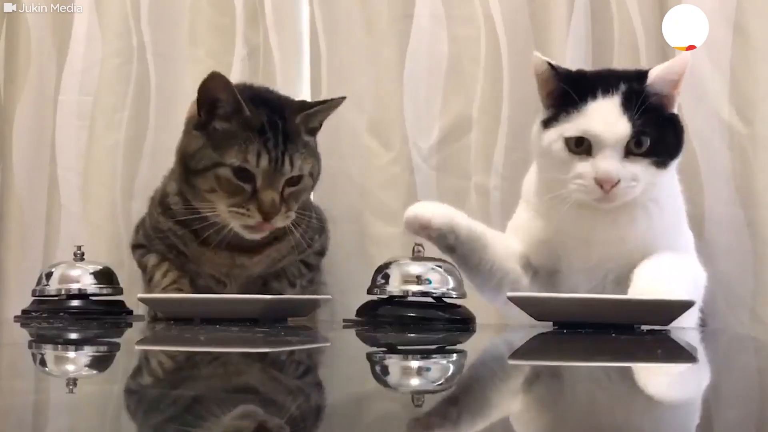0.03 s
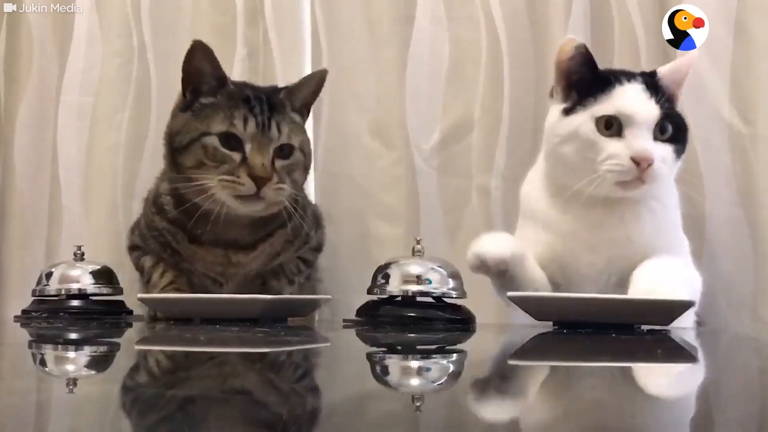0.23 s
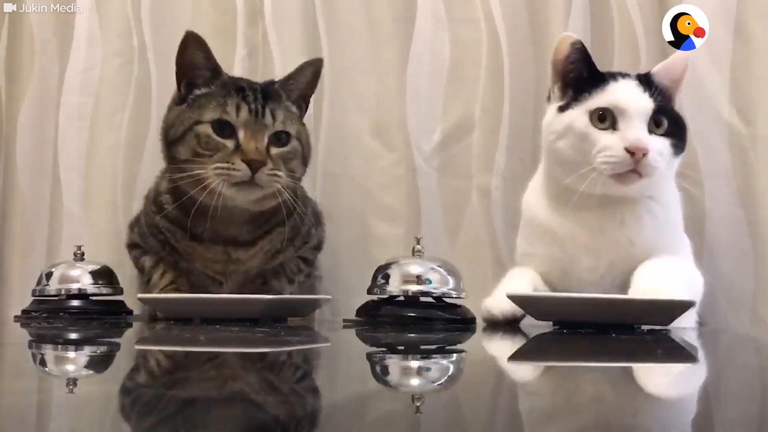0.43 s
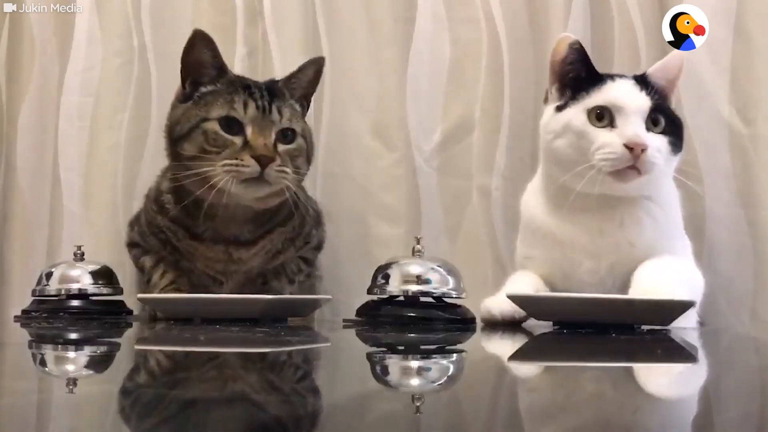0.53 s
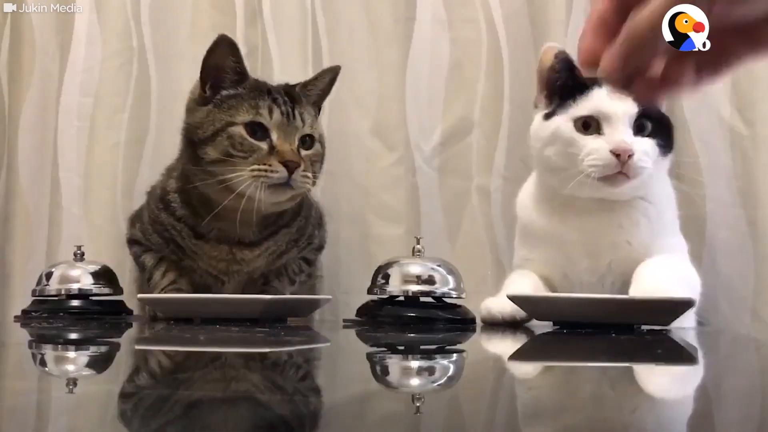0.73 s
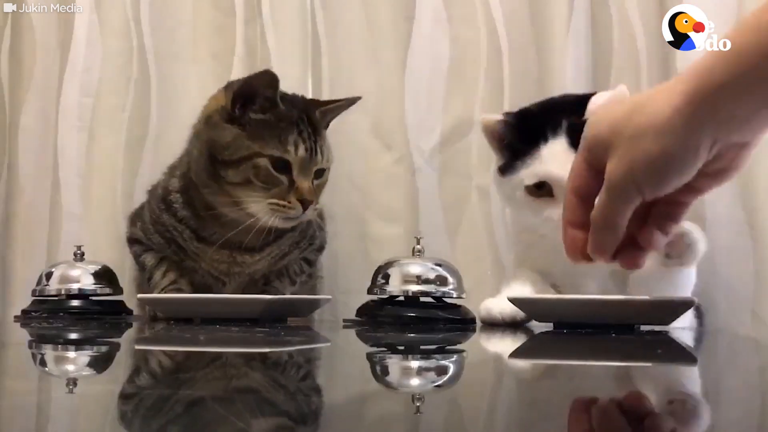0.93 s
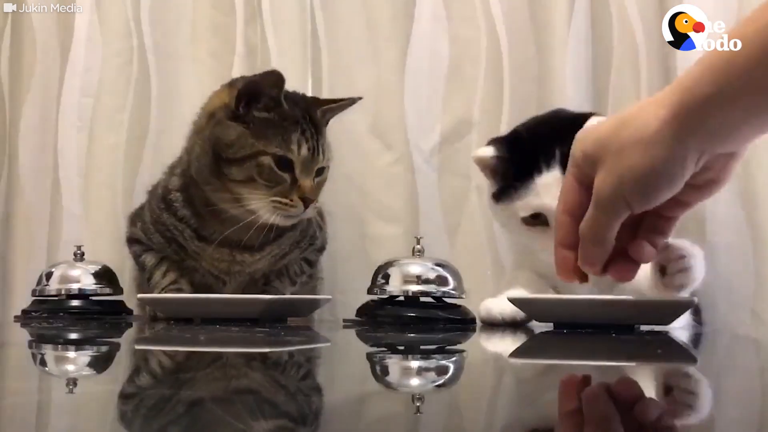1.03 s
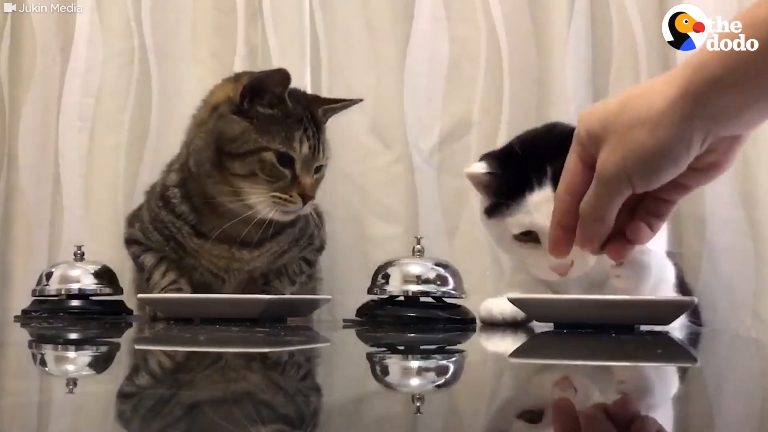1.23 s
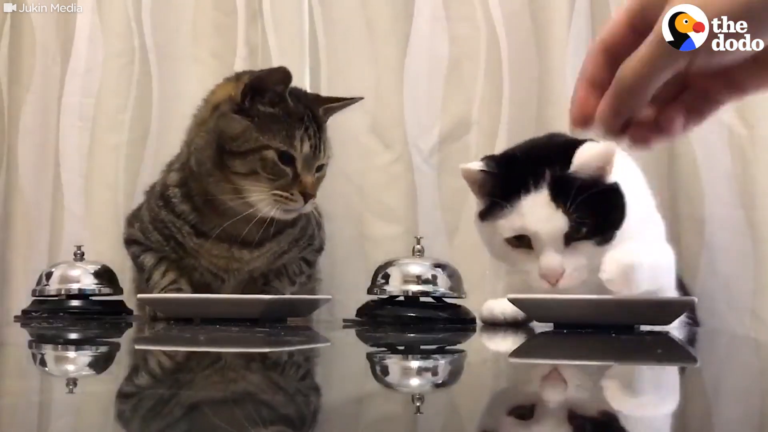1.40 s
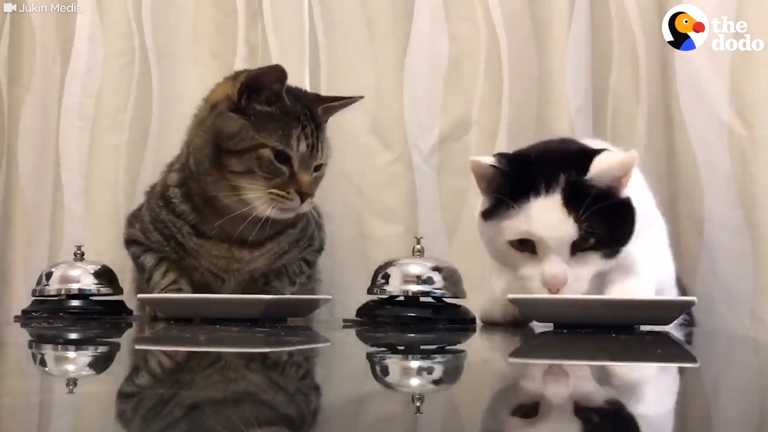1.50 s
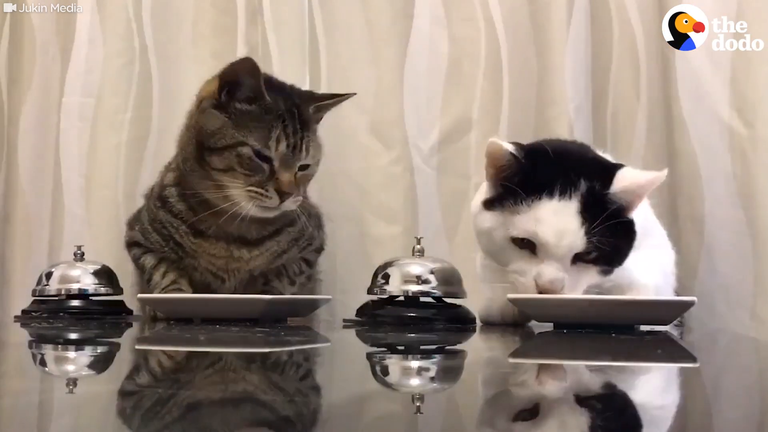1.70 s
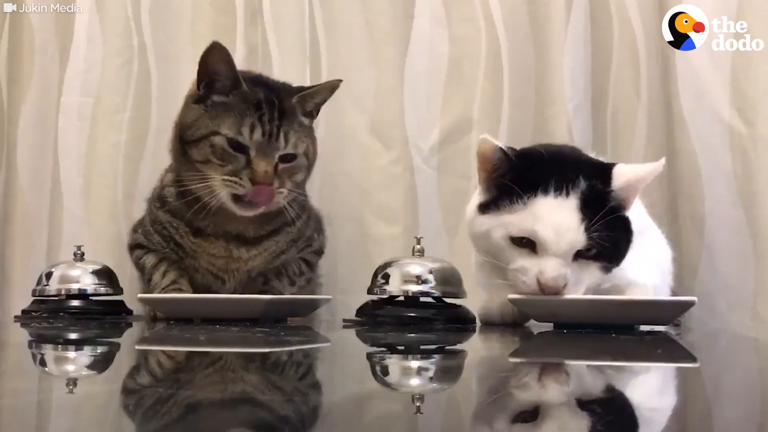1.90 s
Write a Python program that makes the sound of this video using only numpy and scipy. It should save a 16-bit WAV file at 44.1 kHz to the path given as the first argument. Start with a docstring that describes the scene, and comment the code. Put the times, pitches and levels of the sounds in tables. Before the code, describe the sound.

Two bright dings come from a desk bell close to the microphone in a small, quiet room. Its plunger rattles lightly, and the high ring wavers and slowly fades while a hard treat ticks once on a china plate.

```python
"""A counter bell rings twice in quick succession under a cat's paw, on a glass table in a small, quiet room.
The clapper strikes the dome, whose partials beat and swell over the hum of bells struck earlier.
The loose plunger rattles and the base knocks back on the table. A treat ticks on a china plate
and the cat noses at it. Fur brushes and paws rumble faintly above the room tone."""
import sys
import numpy as np
from scipy import signal
from scipy.fft import rfft, irfft
from scipy.io import wavfile

SR = 44100
rng = np.random.default_rng(int(sys.argv[2]) if len(sys.argv) > 2 else 0)


def persist_wave(psi):
    """Save psi, clipped to +-1, as 16-bit WAV."""
    counts = np.round(np.clip(psi, -1, 1) * 32767).astype(np.int16)
    wavfile.write(sys.argv[1], SR, np.atleast_2d(counts).T)


N = 85995

# The clapper hits the dome. Each row: start in seconds, click level in dB.
STRIKES = [(0.2231, -35.5), (0.3571, -33)]
# The pitches of the dome's partials in Hz, low to high.
DOME_HZ = [1114.7, 2864.7, 5219.5, 8122.8, 11582.8, 15447]
# How those partials ring. Each row: level before swell in dB for the first strike and for the second,
# t60 in seconds, beat rate in Hz, beat depth from 0 to 1.
DOME_PARTIALS = [(-62.5, -54.5, 44, 0.8, .08), (-45.5, -37.5, 9.06, 31, 0.04),
                 (-32.5, -30.5, 3.56, 27, 0.05), (-25, -28, 1.07, 8.8, .25), (-27.5, -27.5, .48, 4.0, .15),
                 (-58, -62, .25, 18, .4)]
# Level rides on the second (low) and third (high) partials. Each row: time in seconds, gain in dB.
SWELL_LOW = [(0.225, 2.5), (0.26, 0), (0.38, -2), (0.6, -1), (0.95, 3.5), (1.4, 0), (1.6, 1), (1.75, -3.5),
             (1.93, 2)]
SWELL_HIGH = [(0.23, 2), (0.30, -7), (0.345, -3.5), (0.365, 1.5), (0.44, -2), (0.71, 3), (0.79, 0.5),
              (0.9, 3), (0.96, -1), (1.04, 2), (1.28, -3), (1.38, 0), (1.5, -1.5), (1.93, 1)]
FLUTTER_DEPTH, FLUTTER_HZ = 0.06, 14


def dome():
    """Each strike resets the partials' levels; they beat, swell, and flutter as cats move in the sound."""
    t, ring = seconds(), np.zeros(N)
    starts = [start for start, _ in STRIKES]
    ends = starts[1:] + [np.inf]
    swells = {1: SWELL_LOW, 2: SWELL_HIGH}
    for k, (hz, (*levels_db, t60, beat_hz, beat_depth)) in enumerate(zip(DOME_HZ, DOME_PARTIALS)):
        swell = from_db(np.interp(t, *np.transpose(swells[k]))) if k in swells else 1
        flutter = FLUTTER_DEPTH * (drift(FLUTTER_HZ) + 1j * drift(FLUTTER_HZ))  # in level and phase
        partial = np.exp(2j * np.pi * hz * (t - starts[0]))
        for start, end, db in zip(starts, ends, levels_db):
            beat = beat_depth * np.exp(2j * np.pi * beat_hz * (t - start))
            tone = np.imag(partial * (1 + beat + flutter))
            gate = attack(start) * (1 - attack(end))
            ring += from_db(db) * swell * tone * decay(start, t60) * gate
    return ring


# The plunger clatters in its guide. Each row: start in seconds, level in dB.
RATTLES = [(0.086, -72.5), (0.136, -67.5), (0.200, -63), (0.207, -55), (0.2235, -45.5), (0.254, -44),
           (0.266, -50.5), (0.3572, -45.5), (0.376, -45), (0.395, -51.5), (0.447, -50)]
# The plunger's ring. Each row: pitch in Hz, relative level in dB, t60 in seconds.
PLUNGER_MODES = [(1330, -21, 0.063), (3360, -9, 0.09), (3613, -11.5, 0.11), (4060, -15.5, .08),
                 (4316, -1, .035), (4362, -9, 0.13), (4758, -12, .08), (6400, -10, .055),
                 (7050, -16, 0.044), (9880, -13, 0.068), (10500, -14, .07), (12870, -10.5, .055),
                 (14200, -7.5, .055), (15290, -6, .06)]
# The colour of metal contacts. Each row: frequency in Hz, relative level in dB.
METAL_COLOUR = [(100, -32), (220, -15), (340, -1), (480, -16), (850, -19.5), (1350, -3), (2200, -12),
                (3500, -2.5), (4500, -1.5), (6000, -11), (10000, -5), (13000, -11), (15000, -5)]


def plunger():
    """The clapper clicks on the dome; each rattle of the plunger is a noise burst and a bright ring."""
    clicks = sum(from_db(db) * decay(start, t60=0.01) for start, db in STRIKES)
    chatter = sum(from_db(db - 4.5) * decay(start, t60=0.032) for start, db in RATTLES)
    rings = sum(from_db(db) * struck(PLUNGER_MODES, start, scatter_db=1.5) for start, db in RATTLES)
    return (clicks + chatter) * noise(METAL_COLOUR) + rings


# The base drops back on the table. Each row: start in seconds, level in dB.
KNOCKS = [(0.4455, -51), (0.4545, -54.5)]
# The colour of the knock. Each row: frequency in Hz, relative level in dB.
KNOCK_COLOUR = [(100, -14.5), (220, -14.5), (340, -3.5), (450, -6), (660, -1.5), (820, -17.5), (1350, 5.5),
                (1850, -7.5), (2400, -4.5), (4500, -9.5), (9000, -31), (15000, -23.5)]
# The base's ring. Each row: pitch in Hz, relative level in dB, t60 in seconds.
BASE_MODES = [(350, -23.5, .08), (569, -16.5, .05), (675, -11.5, 0.12), (1321, -9, 0.11),
              (1635, -14, 0.063), (1990, -11.5, 0.076), (2330, -17, .08)]


def base():
    """The bell's base settles on the glass with a double knock."""
    knocks = np.zeros(N)
    for start, db in KNOCKS:
        impact = noise(KNOCK_COLOUR) * decay(start, t60=0.11)
        knocks += from_db(db) * (impact + struck(BASE_MODES, start, scatter_db=2.0))
    return knocks


# The plate's ring. Each row: pitch in Hz, relative level in dB, t60 in seconds.
PLATE_MODES = [(169, -25, .18), (205, -22.5, 0.15), (1450, -31.5, .1), (1727, -26, 0.074),
               (3160, -16, .035), (4200, -27, .07), (4877, -12.5, 0.06), (6740, 1.5, 0.022),
               (6740, -19, .11)]
# The colour of the treat's tick. Each row: frequency in Hz, relative level in dB.
TICK_COLOUR = [(200, -6), (700, -24.5), (1600, 7), (2300, -24.5), (3500, 1.5), (7000, -8), (8800, -31.5),
               (15000, -23.5)]
TREAT_START_S, TREAT_GAIN_DB = 1.3497, -39.5


def treat():
    """A hard treat ticks on the china plate and sets it ringing briefly."""
    tick = from_db(-9.5) * noise(TICK_COLOUR) * decay(TREAT_START_S, t60=0.018)
    ring = struck(PLATE_MODES, TREAT_START_S, scatter_db=1.5)
    return from_db(TREAT_GAIN_DB) * (tick + ring)


# The hum under the ring. Each row: pitch in Hz, level in dB, t60 in seconds.
HUM_PARTIALS = [(1116, -74, 40), (1122.7, -67, 13), (1162.7, -65, 21)]


def lingering_hum():
    """Bells struck earlier still sing on their long-lived lowest partials."""
    return sum(from_db(db) * decay(0, t60) * np.sin(2 * np.pi * (hz * seconds() + rng.random()))
               for hz, db, t60 in HUM_PARTIALS)


# Fur brushes the bell, later the plate. Each row: centre and spread in seconds, level in dB.
BRUSHES = [(0.071, .06, -76.5), (1.884, 0.021, -84)]
# The cats shift their weight. Each row: centre and spread in seconds, level in dB.
WEIGHT_SHIFTS = [(0.47, .02, -73.5), (1.40, .04, -74.5), (1.60, .04, -75.5), (1.76, 0.071, -77)]
# The colours of fur and of table rumble. Each row: frequency in Hz, relative level in dB.
FUR_COLOUR = [(120, -15.5), (350, 3.5), (700, -10.5), (1600, -2), (2400, -11), (4300, -7), (6000, -14),
              (10000, -12), (15000, -28.5)]
RUMBLE_COLOUR = [(30, -20), (65, 1), (100, -4.5), (145, -1), (240, -18.5), (600, -41), (3000, -78)]


def cats():
    """Fur brushes softly and shifting paws make the table rumble."""
    return swelling_noise(BRUSHES, FUR_COLOUR) + swelling_noise(WEIGHT_SHIFTS, RUMBLE_COLOUR)


# The reverb's decay by band. Each row: upper edge in Hz, t60 in seconds.
REVERB_BANDS = [(900, .36), (5000, .28), (17000, 0.17)]
REVERB_RETURN_DB, PREDELAY_S = -5, 0.0046


def reverb(send):
    """The small room's reflections blur into a short tail that lasts longer in the bass."""
    white, bins = rfft(rng.standard_normal(N)), np.fft.rfftfreq(N, 1 / SR)
    lows = [0] + [hz for hz, _ in REVERB_BANDS]
    tail = sum(irfft(white * (bins > low) * (bins <= high), N) * decay(PREDELAY_S, t60)
               for low, (high, t60) in zip(lows, REVERB_BANDS))
    return from_db(REVERB_RETURN_DB) * signal.fftconvolve(send, tail / np.linalg.norm(tail))[:N]


# The colour of the quiet room. Each row: frequency in Hz, relative level in dB.
ROOM_TONE_COLOUR = [(22, -28), (40, -2), (70, 4.5), (140, -3), (280, -11), (550, -16.5), (1400, -18),
                    (2400, -24), (5000, -46), (10000, -36), (14000, -25), (16000, -37)]


def room_tone():
    """A faint, steady, bass-heavy bed of noise."""
    return from_db(-74) * noise(ROOM_TONE_COLOUR)


def from_db(db):
    """Decibels to gain."""
    return 10 ** (np.asarray(db) / 20)


def seconds():
    """Time of every sample."""
    return np.arange(N) / SR


def attack(start, contact_s=0.00041):
    """Smooth step from 0 to 1 while two hard bodies touch."""
    return np.sin(np.pi / 2 * np.clip((seconds() - start) / contact_s, 0, 1)) ** 2


def decay(start, t60):
    """An envelope that opens at start and falls 60 dB every t60 seconds."""
    age = seconds() - start
    return (age >= 0) * from_db(-60 * np.maximum(age, 0) / t60)


def struck(modes, start, scatter_db):
    """One blow on a body: each mode rings down, its level scattered and its polarity random."""
    age, ring = seconds() - start, np.zeros(N)
    for hz, db, t60 in modes:
        strength = from_db(db + scatter_db * rng.standard_normal()) * rng.choice([-1, 1])
        ring += strength * np.sin(2 * np.pi * hz * age) * decay(start, t60)
    return attack(start) * ring


def noise(colour):
    """White noise through an EQ curve, rms 1."""
    hz, db = np.transpose(colour)
    bins = np.maximum(np.fft.rfftfreq(N, 1 / SR), 1)
    eq = from_db(np.interp(np.log(bins), np.log(hz), db))
    coloured = irfft(rfft(rng.standard_normal(N)) * eq, N)
    return coloured / coloured.std()


def swelling_noise(swells, colour):
    """Noise that fades in and out once for each row."""
    envelope = sum(from_db(db) * np.exp(-.5 * ((seconds() - centre) / spread) ** 2)
                   for centre, spread, db in swells)
    return noise(colour) * envelope


def drift(rate_hz):
    """Random wander, mostly slower than rate_hz, rms 1."""
    bins = np.fft.rfftfreq(N, 1 / SR)
    wander = irfft(rfft(rng.standard_normal(N)) / (1 + (bins / rate_hz) ** 4) * (bins > 0), N)
    return wander / wander.std()


def scene():
    """The mono mix: dry bell tones, small contacts with reverb, and room tone."""
    clatter = plunger() + base() + cats()
    plate = treat()
    tail = reverb(clatter + from_db(-8) * plate)  # the plate sounds less into the room
    return (dome() + lingering_hum() + clatter + plate + tail + room_tone())[None]


def record(dry):
    """A steep low-pass takes off the very top."""
    high_cut = signal.ellip(10, .1, 80, 15900, fs=SR, output="sos")
    return signal.sosfilt(high_cut, dry)


dry = scene()
out = record(dry)
persist_wave(out)
```